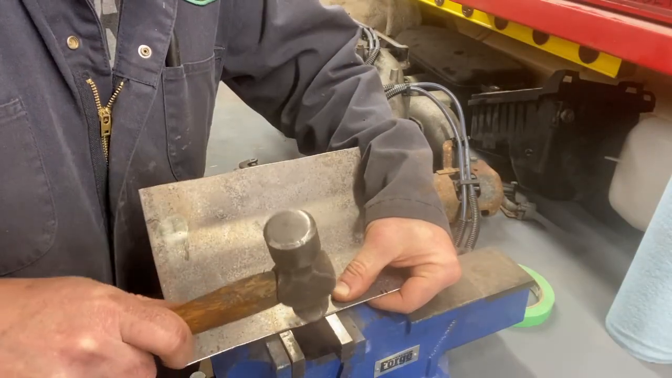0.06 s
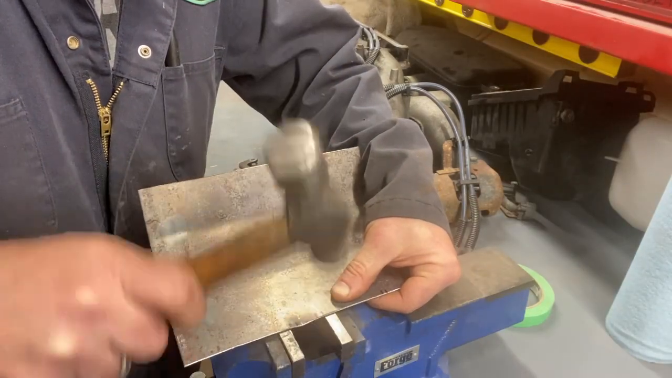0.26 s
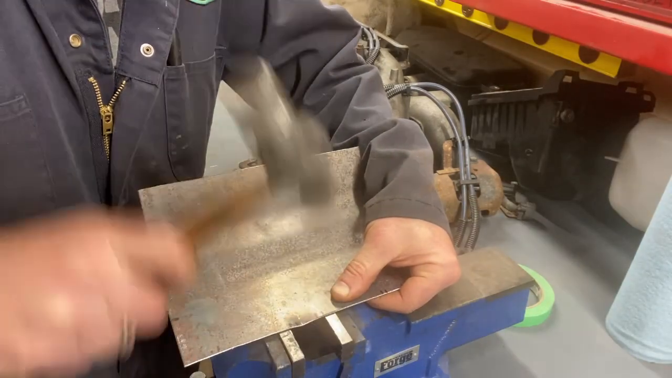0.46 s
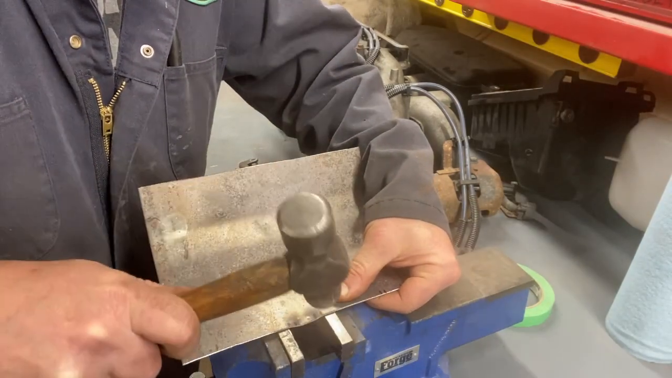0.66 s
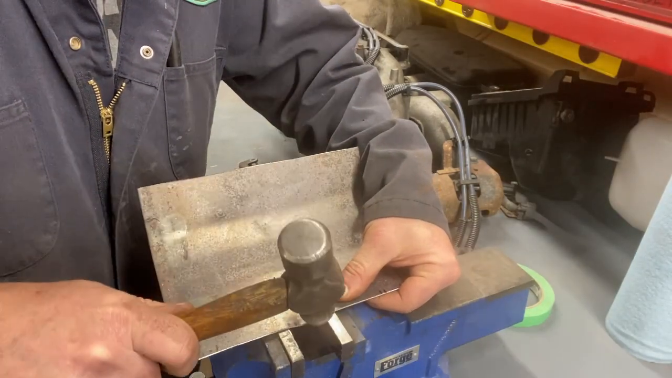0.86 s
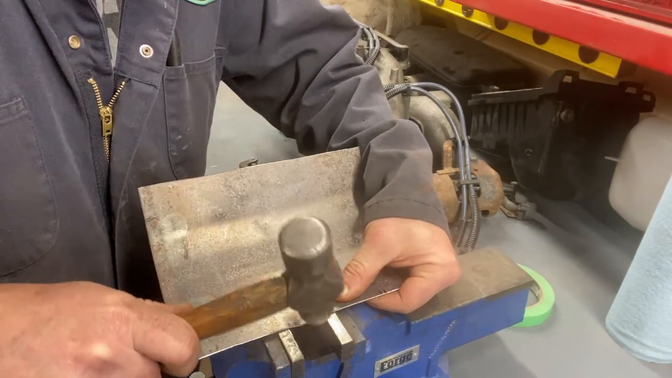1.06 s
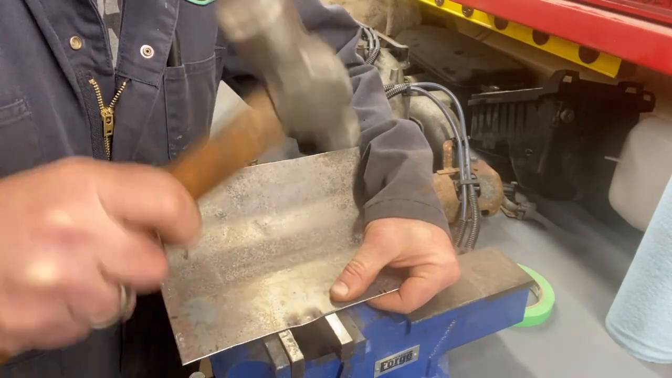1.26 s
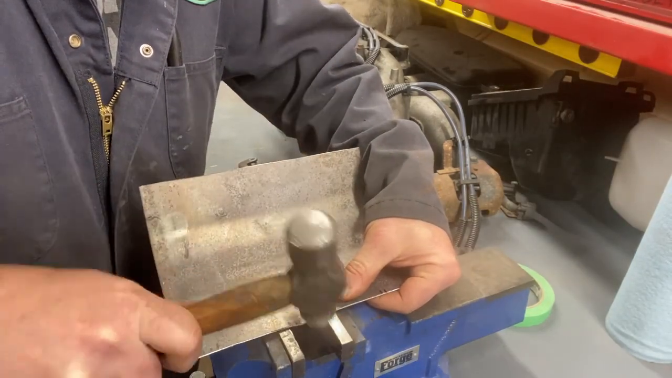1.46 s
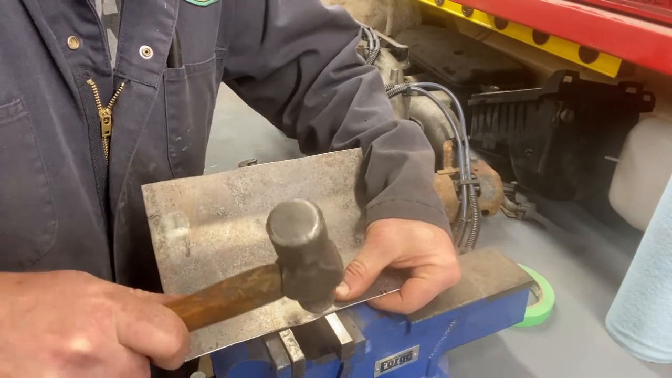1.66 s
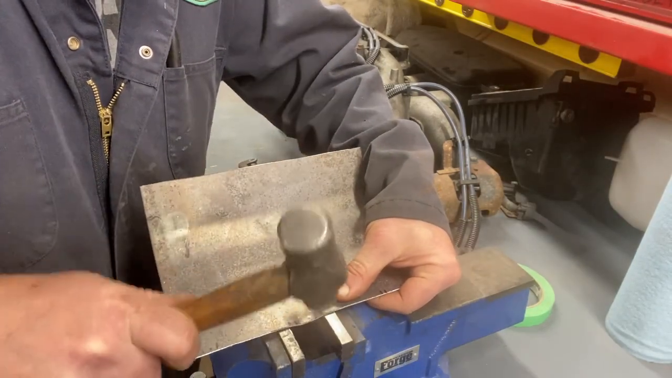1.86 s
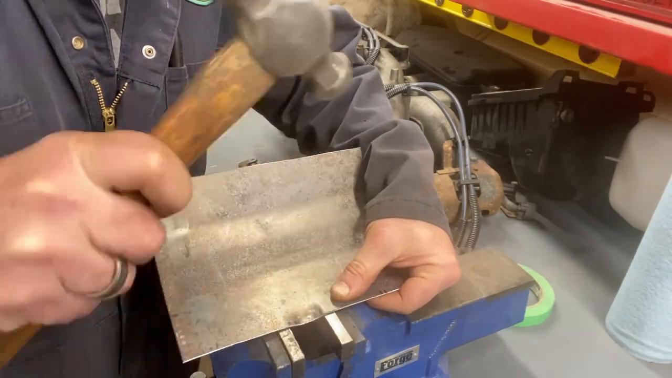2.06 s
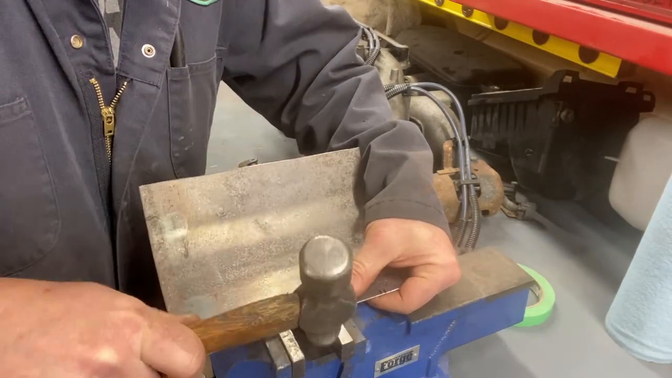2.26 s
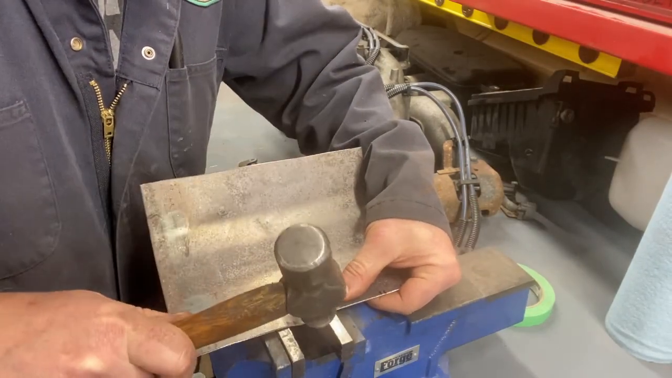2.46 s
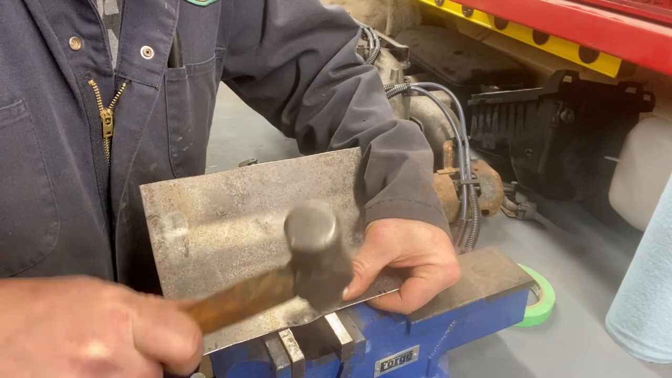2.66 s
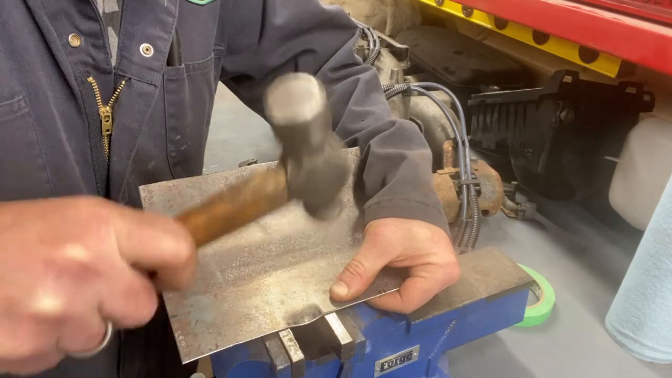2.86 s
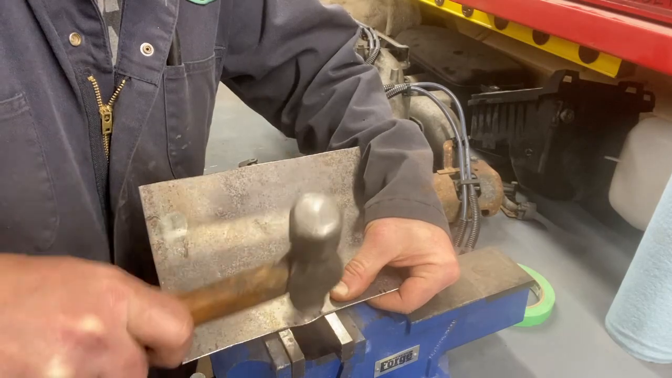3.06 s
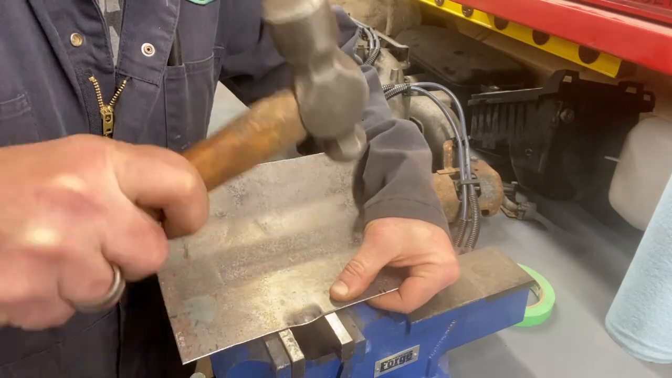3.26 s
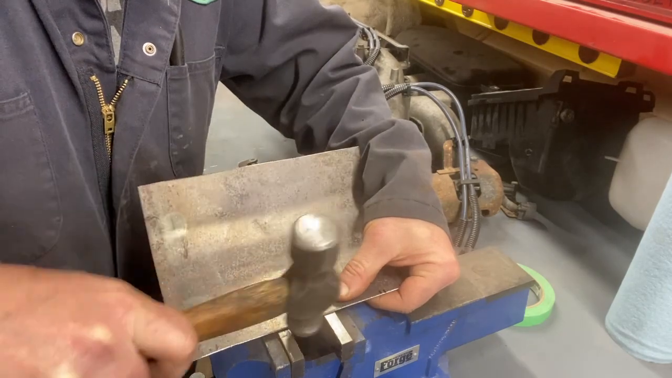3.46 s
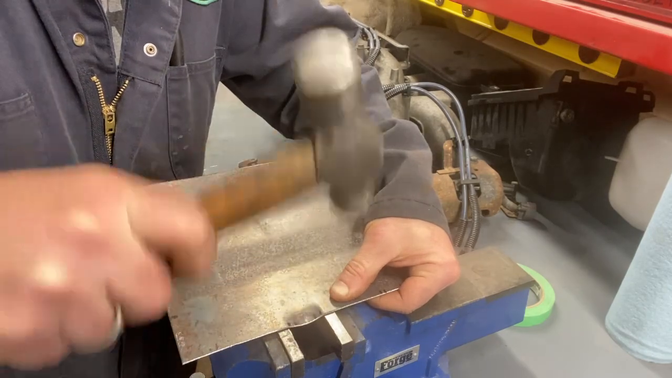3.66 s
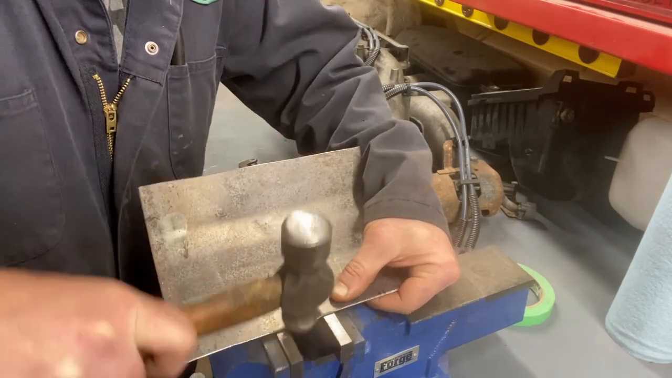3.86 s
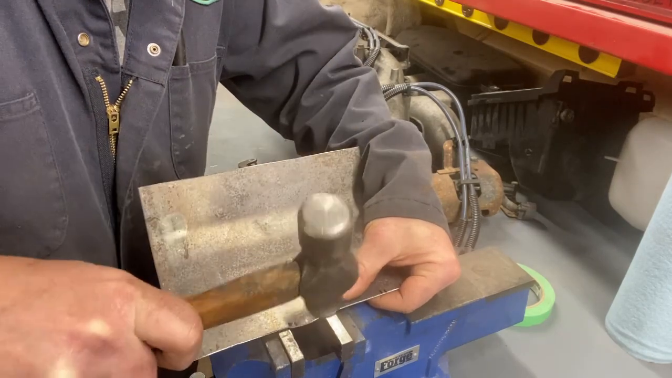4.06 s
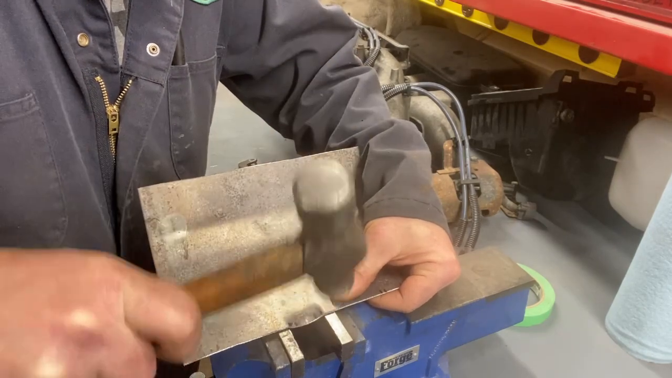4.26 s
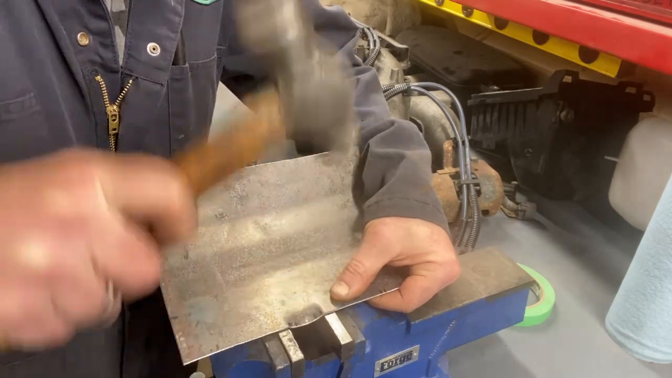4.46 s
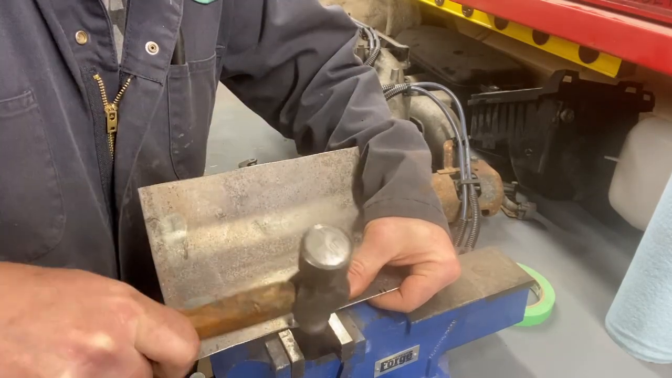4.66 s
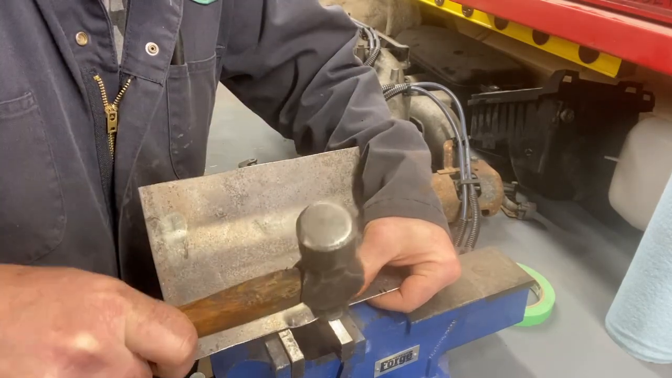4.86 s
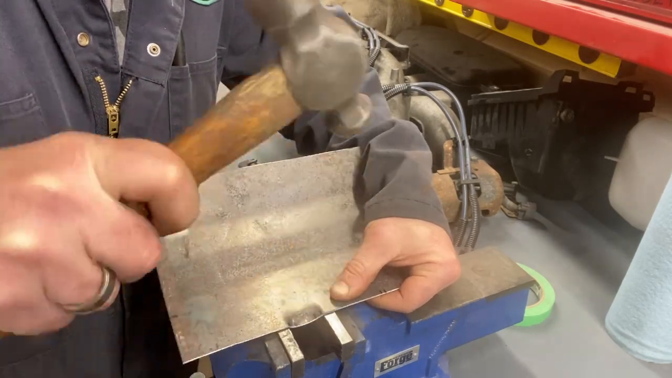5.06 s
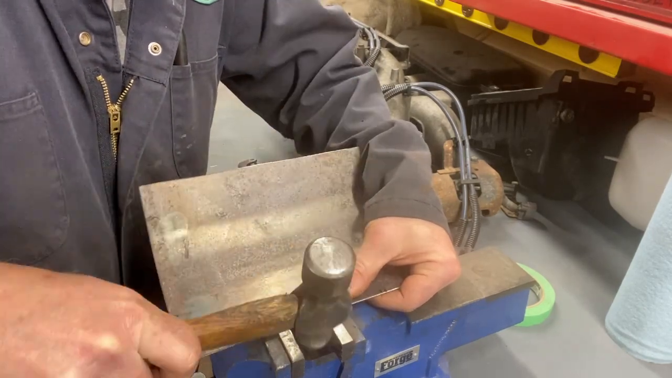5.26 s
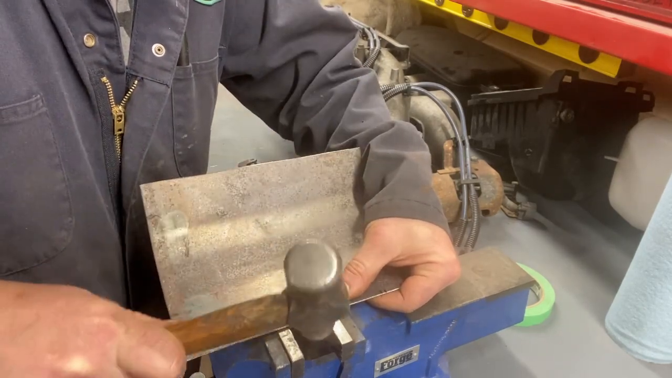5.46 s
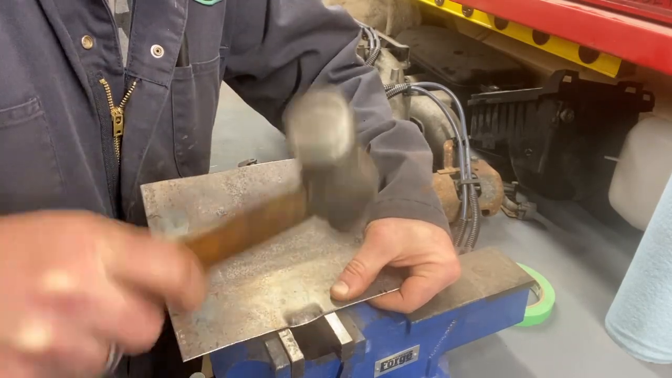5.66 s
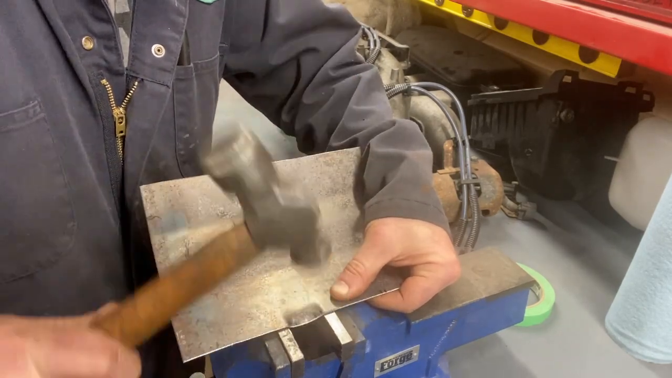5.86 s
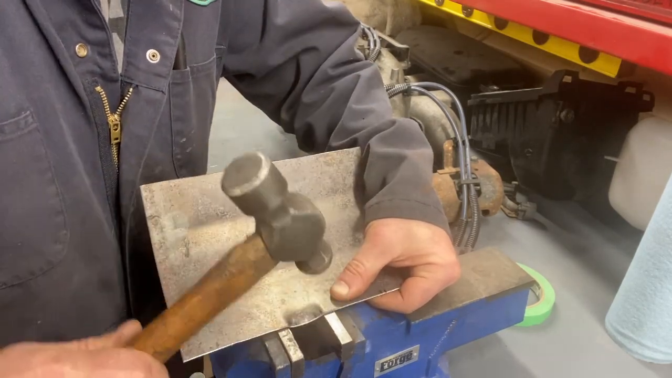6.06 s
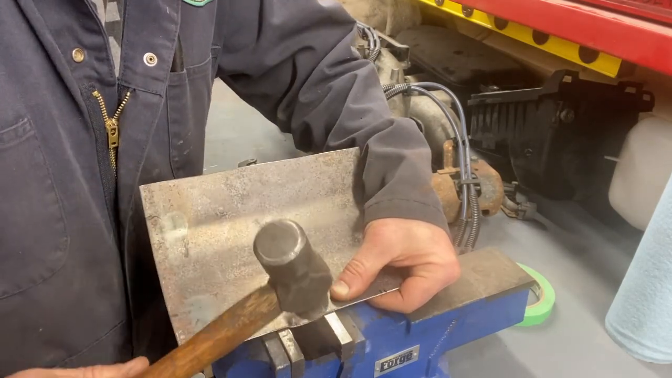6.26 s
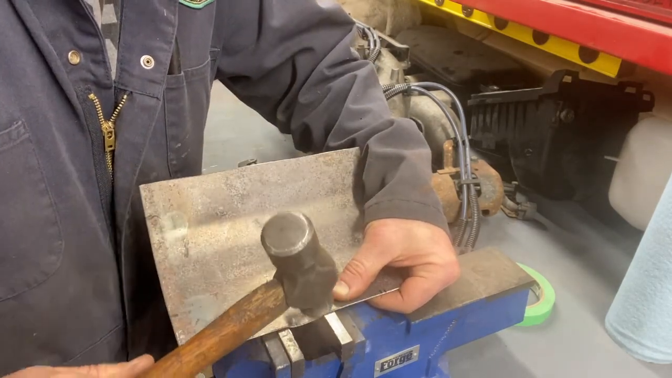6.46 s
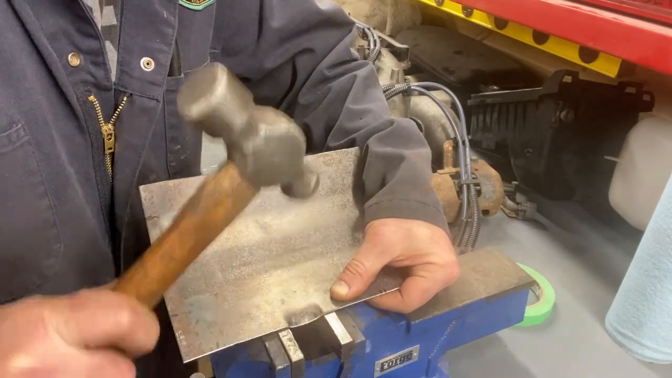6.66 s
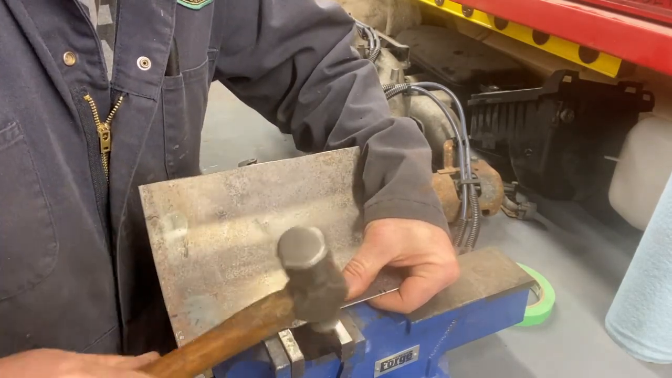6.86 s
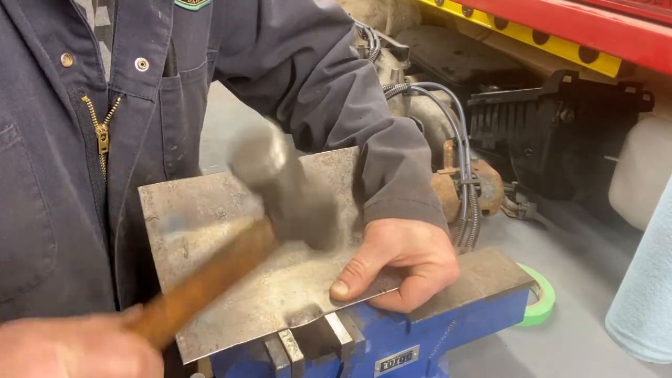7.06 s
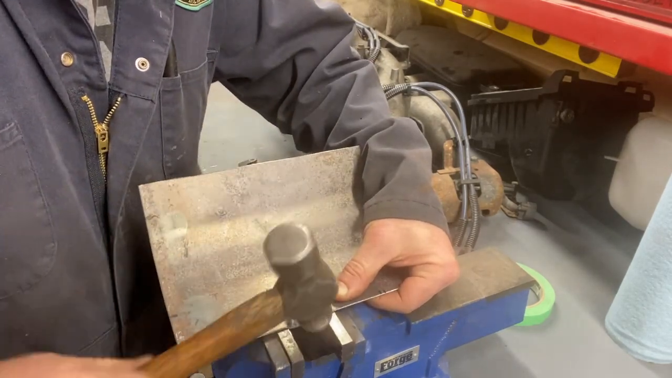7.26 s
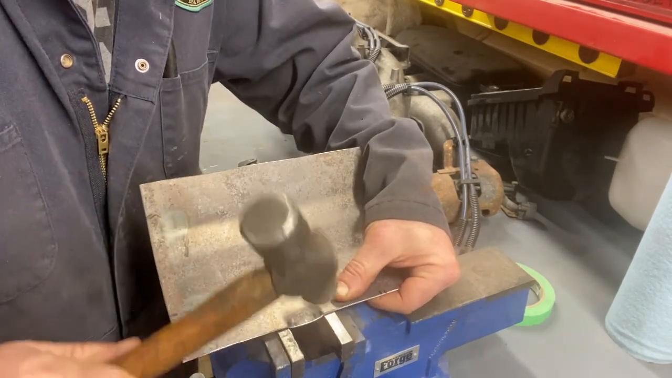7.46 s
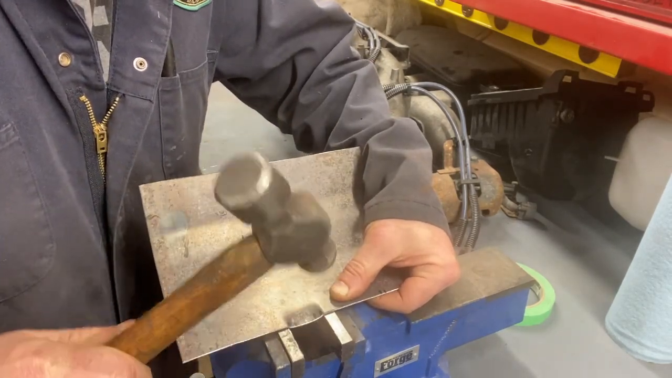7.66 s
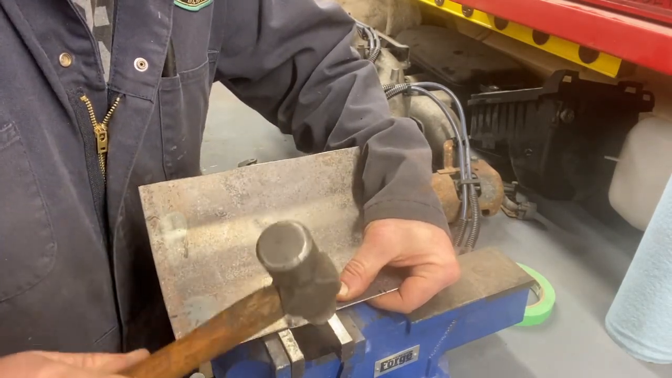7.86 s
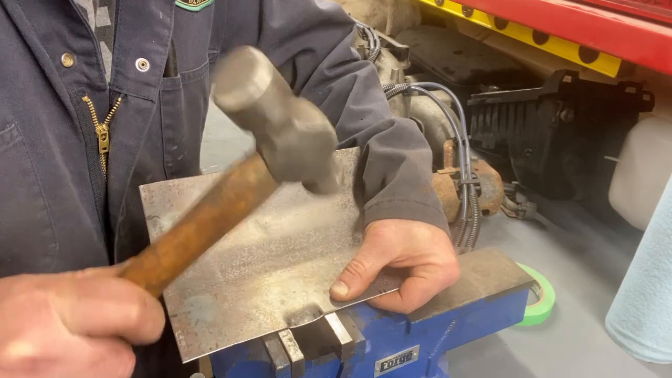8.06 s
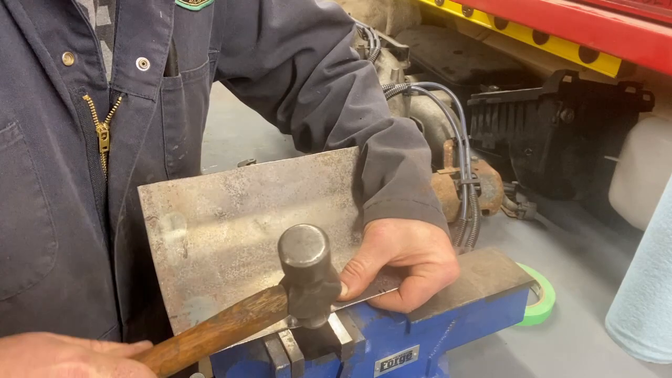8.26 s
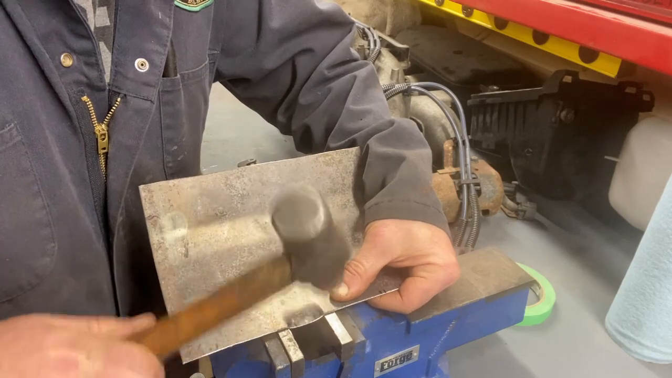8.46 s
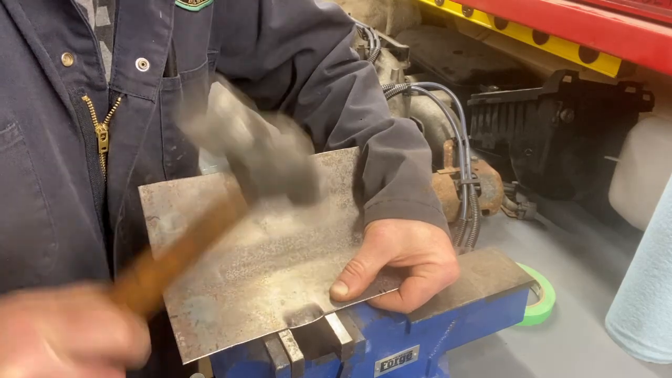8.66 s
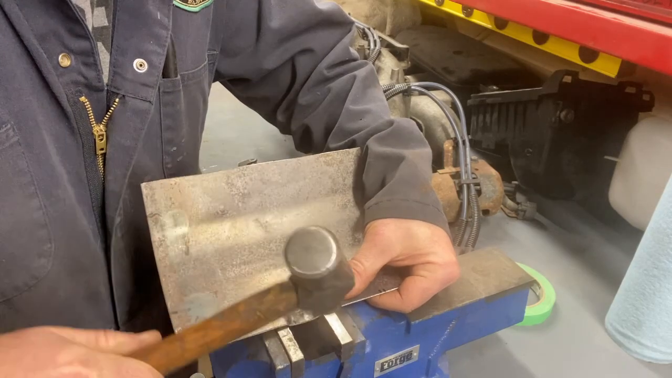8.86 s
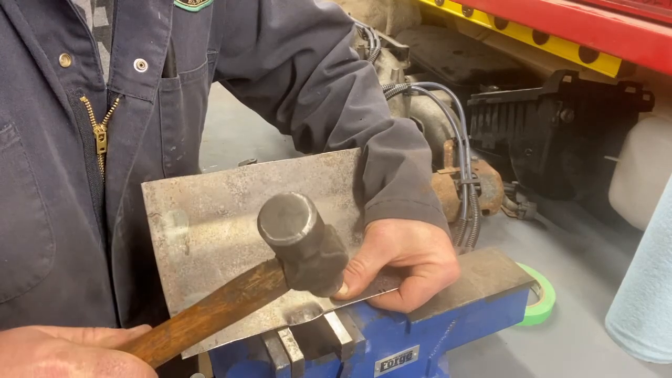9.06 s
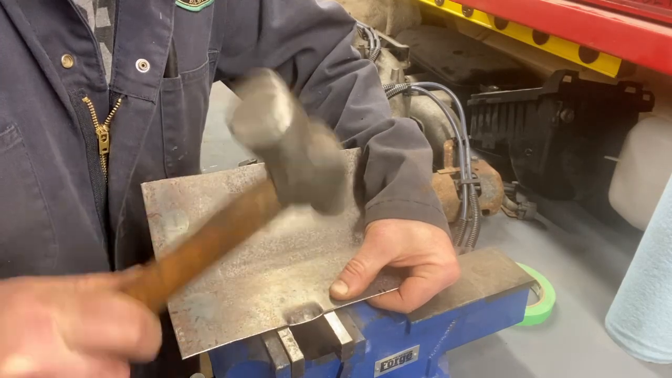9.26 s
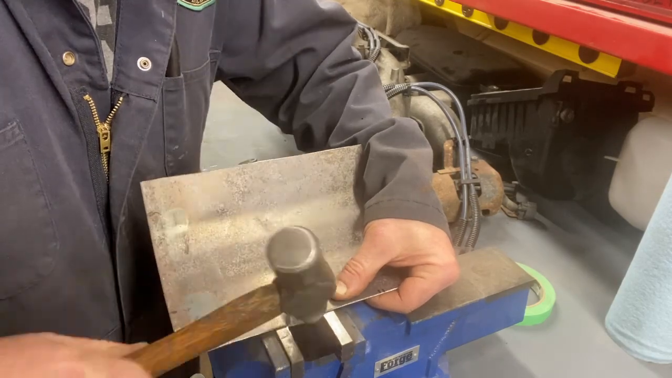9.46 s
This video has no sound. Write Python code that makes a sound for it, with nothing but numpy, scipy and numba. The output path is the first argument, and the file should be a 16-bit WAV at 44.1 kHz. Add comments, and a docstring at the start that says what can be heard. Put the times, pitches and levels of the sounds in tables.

```python
"""Hammering sheet metal in a garage

A steel hammer beats a sheet-metal edge held in a bench vise, a short step from the microphone.
Each impact cracks, clatters through sheet and jaws, excites the sheet's normal modes and thumps the
bench. Light ticks and soft rustles fall between blows; bare walls reverberate over very quiet air."""
import sys
import numpy as np
from scipy import signal
from scipy.fft import rfft, irfft, next_fast_len
from scipy.io import wavfile
from scipy.ndimage import uniform_filter1d
from numba import njit

SR = 44100
rng = np.random.default_rng(int(sys.argv[2]) if len(sys.argv) > 2 else 0)


def to_wav(sig):
    """Store sig (one row per channel, or 1-D mono) as 16-bit WAV at the path in sys.argv[1].

    Samples outside -1..1 are clipped; the rate is SR.
    """
    pcm = np.clip(np.atleast_2d(sig), -1, 1) * 32767
    pcm = np.round(pcm).astype(np.int16)
    wavfile.write(sys.argv[1], SR, pcm.T)  # frames by channels


N = 419391
LEAD_IN_S = .6  # room for a blow struck before time zero


def undb(db):
    return 10 ** (np.asarray(db) / 20)


def on_log(table, hz):
    """Interpolate (Hz, value) rows along a logarithmic frequency axis."""
    points = np.array(table, float)
    return np.interp(np.log(hz + 1), np.log(points[:, 0] + 1), points[:, 1])


def fade(t, t60):
    """Exponential damping: the level falls 60 dB in t60 seconds."""
    return np.exp(-np.log(1000) * t / t60)


def add(track, start_s, sound):
    """Superposition: sum a sound into the track."""
    i = int((start_s + LEAD_IN_S) * SR)
    part = sound[..., :track.shape[-1] - i]
    track[..., i:i + part.shape[-1]] += part


def bin_hz(size):
    return np.arange(size // 2 + 1) * SR / size


def noise(size, colour):
    """Spectral shaping: white noise filtered by (Hz, dB) rows."""
    return irfft(rfft(rng.standard_normal(size)) * undb(on_log(colour, bin_hz(size))), size)


def damped_noise(size, colour, t60s):
    """Frequency-dependent damping: each octave band of a noise decays at its own rate."""
    source = noise(size, colour)
    spectrum, hz = rfft(source), bin_hz(size)
    t, out = np.arange(size) / SR, 0
    for centre in 30 * 2. ** np.arange(10):
        share = np.clip(1 - np.abs(np.log2((hz + 1) / centre)), 0, 1)
        out = out + irfft(spectrum * share, size) * fade(t, on_log(t60s, centre))
    return out / np.std(source)


def flicker(size, step, depth_db):
    """Random amplitude modulation: a smoothed gain, drawn anew every `step` samples."""
    levels = np.repeat(rng.standard_normal(size // step + 1), step)
    return undb(depth_db * uniform_filter1d(levels, size=step // 2)[:size])


def modes(size, hz, t60, db, spread_rad, wobble=1, wobble_hz=55, wobble_db=3.5, rad_per_khz=0.65):
    """Modal synthesis: damped, wavering sinusoids, each with its own phase between the channels."""
    t, knots = np.arange(size) / SR, np.arange(size // 512 + 2) / wobble_hz
    out = np.zeros((2, size))
    for f, decay, gain in zip(hz, t60, undb(db)):
        phase, lead = 2 * np.pi * rng.random(), spread_rad * rng.standard_normal()
        level_drift, phase_drift = wobble * rng.standard_normal((2, len(knots)))
        waver = undb(wobble_db * level_drift * (knots > 0))
        waver = waver * np.exp(1j * (phase + rad_per_khz * f / 1000 * phase_drift))
        age = t[t < 1.3 * decay]
        z = gain * np.exp(2j * np.pi * f * age) * fade(age, decay) * np.interp(age, knots, waver)
        out[:, :len(z)] += np.cos(lead / 2) * z.imag + np.sin(lead / 2) * np.array([z.real, -z.real])
    return out


def tilt(table, treble_db, bass_db):
    """Impact spectrum: a shorter contact adds treble to (Hz, dB) rows, a fuller swing adds bass."""
    hz, db = np.transpose(table)
    slope = [(150, bass_db), (600, 0.0031), (2000, 0.0051), (7000, treble_db)]
    return np.transpose([hz, db + on_log(slope, hz)])


# Spectrum of the still room. Each row: frequency in Hz, relative density in dB.
AIR_SPECTRUM = [(15, -36.5), (25, -2), (86, -4.5), (358, -25), (756, -24), (1140, -25), (5120, -41.5),
                (7350, -47.5), (12000, -55.5), (15600, -70), (22000, -120)]


def room_air(size, level_db=-68):
    """Ambient noise floor: a faint hush, partly coherent between the channels."""
    common, left, right = (noise(size, AIR_SPECTRUM) for _ in range(3))
    air = common + 0.66 * np.array([left, right])
    return undb(level_db) * air / np.std(air)


# Spectrum of the wall reflections. Each row: frequency in Hz, relative density in dB.
WALL_SPECTRUM = [(40, -0.5), (150, -10.5), (600, -4.5), (2000, 6), (5000, 4), (9000, 2), (15000, -9.5)]
# Reverberation time. Each row: frequency in Hz, t60 in seconds.
WALL_T60 = [(60, 3.5), (200, 3.9), (600, 1.11), (1500, 0.72), (3500, 0.65), (7000, 0.5), (12000, 0.34)]
# Coherence of the reflections. Each row: frequency in Hz, share of power common to both channels.
WALL_COHERENCE = [(60, 0.49), (200, 0.77), (1000, 0.26), (8000, 0.37)]


def wall_reverberation(x, size=49152):
    """Diffuse field: convolution with a noise tail that builds up as echoes gather, then decays."""
    common, left, right = (rfft(damped_noise(size, WALL_SPECTRUM, WALL_T60)) for _ in range(3))
    shared = np.clip(on_log(WALL_COHERENCE, bin_hz(size)), 0, 1)
    n = np.arange(size)
    envelope = (1 - np.exp(-n / SR / 0.0013)) * (1 - n / size) ** 2
    tails = (irfft(np.sqrt(shared) * common + np.sqrt(1 - shared) * own, size) for own in (left, right))
    return np.array([signal.fftconvolve(x, envelope * tail)[:len(x)] for tail in tails])


# Rustles between blows. Each row: start in seconds, level in dB, hold in seconds.
RUSTLES = [(2.58, -50.5, .12), (5.601, -48, 0.049), (9.233, -59, 0.44)]
# Spectrum of the rubbing. Each row: frequency in Hz, relative density in dB.
RUSTLE_SPECTRUM = [(59, -44), (100, -11.5), (244, 7.5), (349, -5.5), (459, -12.5), (851, -6.5), (927, -12),
                   (6000, -52.5), (7800, -68.5), (13200, -120)]


def rustles(attack_s=.05, t60_s=1.1):
    """Friction noise, as of hand and sheet shifting: each low rustle swells, holds and fades."""
    t = np.arange(N) / SR
    rub = noise(next_fast_len(N), RUSTLE_SPECTRUM)[:N]
    envelope = 0
    for start, db, hold in RUSTLES:
        swell = np.clip((t - start) / attack_s, 0, 1)
        envelope += undb(db) * swell * fade(np.maximum(t - start - hold, 0), t60_s)
    return rub / np.std(rub) * flicker(N, 1024, depth_db=2.9) * envelope


# Hammer touching sheet. Each row: start in seconds, level in dB, centre in Hz, length in seconds.
TOUCHES = [(0.429, -66, 4430, 0.0058), (0.455, -67, 3426, 0.0057), (5.64, -61, 2500, 0.052),
           (5.752, -69, 2820, 0.055), (5.785, -64, 3460, 0.052), (7.833, -73.5, 5460, 0.033)]


def touches(track, size=8192):
    """Light contact of steel on steel: ticks and short scrapes of band-limited noise."""
    t = np.arange(size) / SR
    for start, db, hz, length in TOUCHES:
        grit = noise(size, [(hz / 4, -20), (hz, 0), (hz * 1.7, -16), (hz * 2.9, -40)])
        add(track, start, undb(db) * grit / np.std(grit) * np.exp(-(t / length) ** 2))


# Modes of the bench. Each row: frequency in Hz, t60 in seconds, relative level in dB.
BENCH_MODES = [(58, 0.15, -17), (68.7, 0.67, -17.5), (75.27, 0.89, -24.5), (108.25, 0.34, -29),
               (170.4, 0.93, -29), (229, 0.33, -16)]


def bench_thump(t, bass_db):
    """Structure-borne sound: the blow drives the bench's low modes, which rise slowly."""
    hz, t60, db = np.transpose(BENCH_MODES)
    hz = hz * (1 + 0.019 * rng.standard_normal(len(hz)))
    return modes(len(t), hz, t60, db + bass_db, spread_rad=0.12) * (1 - np.exp(-(t / 0.0046) ** 2))


# Modes of the clamped sheet. Each row: frequency in Hz, t60 in seconds, then four relative
# levels in dB, for a blow on stretch 0, 1, 2 or 3 of the edge.
SHEET_MODES = [(213.3, 0.89, -17, -17.5, -19.5, -16), (278.6, 0.28, 4, -6.5, -2, -0.5),
               (324, 0.34, -8, -12, -7.5, -8.5), (422.6, 0.22, -8.5, -13, -0.5, -2.5),
               (517.4, 0.47, -15.5, -6, -13.5, -5.5), (577, 0.71, -18, -5.5, -20.5, -19),
               (765, 0.46, -13.5, -9, -10.5, -14.5), (894, 0.26, -0.5, -4, -2.5, -3.5),
               (1038, 0.31, -7, -9, 13, -10.5), (1243, 0.28, -3, -14, -2.5, -17),
               (1420, 7.7, -49.5, -49, -49.5, -64), (1458, 0.27, -15, -4.5, 3, -1),
               (1680, 0.34, -8, -12.5, -17, -3), (2040, 0.4, -11, -18, -17.5, -23.5),
               (2280, 0.67, -18.5, -20.5, -24.5, -20), (2780, 0.26, -19, -10.5, -0.5, -7),
               (2940, 0.46, -5.5, -28, -29, -35), (3460, 0.13, -20, -17.5, -11, -11.5),
               (3730, .3, -11.5, -19, -16.5, -15.5), (4400, 0.2, -8, -21.5, -18, -24.5),
               (4730, 0.56, -13, -28, -21.5, -15), (5160, 0.26, -16.5, -24.5, -33, -27),
               (6700, 0.2, -11.5, -36, -35, -30)]
DULL_ABOVE_HZ = 4200  # a soft blow hardly excites the modes above this


def sheet_ring(t, treble_db, bass_db, stretch, head_rests, hand_cycles=1350, resting_t60_s=.22):
    """Plate vibration: the point of impact weights the modes; the hand and a resting head damp them."""
    hz, t60, *by_stretch = np.transpose(SHEET_MODES)
    db = tilt(np.transpose([hz, by_stretch[stretch]]), treble_db, bass_db)[:, 1]
    db = db + 0.71 * rng.standard_normal(len(hz)) + min(treble_db, 0) * (hz > DULL_ABOVE_HZ)
    t60 = np.where(hz > 2000, np.minimum(t60, hand_cycles / hz), t60)
    if head_rests:
        t60 = np.minimum(t60, resting_t60_s)
    hz = hz * (1 + .003 * rng.standard_normal(len(hz)))
    return modes(len(t), hz, t60, db, spread_rad=1)


# Modes of the hammer head. Each row: frequency in Hz, t60 in seconds, relative level in dB.
HEAD_MODES = [(3494, 0.041, 2), (3870, 0.15, -6), (6060, 0.049, -15)]


def knock_and_ping(edge_hz, edge_db, head_db, treble_db, rebound_s, edge_t60_s=0.036, size=4096):
    """Impact and rebound: the pinned edge knocks and the head pings twice, the second knock lower."""
    out = np.zeros((2, size + SR // 20))
    head_hz, head_t60, ping_db = np.transpose(HEAD_MODES)
    ping_db = ping_db + head_db + min(treble_db, 0) * (head_hz > DULL_ABOVE_HZ)
    attack = 1 - np.exp(-np.arange(size) / SR / 0.00016)
    for delay_s, gain_db, pitch_ratio in ((0, 0, 1), (rebound_s, -3.5, .64)):
        detune, scatter = rng.standard_normal((2, len(HEAD_MODES) + 1))
        hz = np.r_[edge_hz * pitch_ratio * (1 + .03 * detune[0]), head_hz * (1 + .006 * detune[1:])]
        db = np.r_[edge_db, ping_db] + gain_db + 1.4 * scatter
        hit = modes(size, hz, np.r_[edge_t60_s, head_t60], db, spread_rad=0.37, wobble=0)
        i = int(delay_s * SR)
        out[:, i:i + size] += hit * attack
    return out


# Spectrum of sheet and jaws rattling. Each row: frequency in Hz, relative density in dB.
CLATTER_SPECTRUM = [(24, -36), (40, -11.5), (176, -1), (249, -1.5), (479, -11.5), (600, -2.5), (680, -7.5),
                    (1070, -4), (1300, -9.5), (2700, -14.5), (6020, -24), (14100, -61.5), (16000, -87.5)]
# Damping of the clatter. Each row: frequency in Hz, base t60 in seconds.
CLATTER_T60 = [(60, 0.52), (250, 0.32), (1000, 0.41), (3000, 0.33), (8000, 0.28), (14000, 0.06)]
# Each entry: the factor on that t60 for one stretch of the edge.
CLATTER_SUSTAIN = [0.73, 0.88, 0.79, 1]


def clatter(t, treble_db, bass_db, stretch):
    """Extended source: the wide sheet rattles in bursts, differing between channels above the bass."""
    colour = tilt(CLATTER_SPECTRUM, treble_db, bass_db)
    t60s = np.array(CLATTER_T60) * [1, CLATTER_SUSTAIN[stretch]]
    mid = damped_noise(len(t), colour, t60s)
    side = 0.88 * damped_noise(len(t), tilt(colour, 0, -11.5), t60s)
    envelope = (1 - np.exp(-t / 0.0059)) * flicker(len(t), 256, depth_db=2.5)
    return np.array([mid + side, mid - side]) * envelope


# Spectrum of the contact. Each row: frequency in Hz, relative density in dB.
CRACK_SPECTRUM = [(50, -35.5), (90, -13.5), (330, -3), (650, -5.5), (1000, -9.5), (1600, 1.5), (2500, -1.5),
                  (3000, -7), (3480, -7.5), (4100, -11.5), (5900, -10.5), (8500, -23), (11700, -36.5),
                  (16000, -53.5)]


def crack(t, treble_db, bass_db, chatter_s, gain_db=5.5):
    """Contact noise: a broadband burst that lasts while the head chatters on the steel."""
    burst = noise(len(t), tilt(CRACK_SPECTRUM, treble_db, bass_db))
    return undb(gain_db) * burst / np.std(burst) * fade(t, 0.13) / (1 + (t / chatter_s) ** 8)


# Hammer blows; only the tail of the first is heard. Each row: start in seconds, level in dB,
# treble, bass, clatter and ring offsets in dB, chatter time in seconds, knock pitch in Hz,
# knock and head ping offsets in dB, rebound delay in seconds.
BLOWS = [(-0.36, -6.5, -6.5, 2.5, -1, -10.5, 0.0038, 1500, 2.5, -3, .005),
         (0.157, -22, 10, 1, -3.5, -9.5, 0.0078, 950, 5.5, -5.5, .005),
         (0.541, -5, 1.5, -1, 4, -7, 0.018, 1700, 3, -8, .004),
         (1.452, -5.5, 4.5, -1.5, 6, -9, 0.011, 1300, 3, -7, .003),
         (2.207, -5, 3, -1, 0.5, -9.5, 0.027, 1500, 3.5, -4.5, .005),
         (3.05, -31, -13, -0.5, 3, 5.5, 0.0042, 1000, 12, -14, .006),
         (3.436, -8.5, 5.5, -4.5, 5.5, -3.5, 0.0077, 1350, 2, -2, .006),
         (3.9, -5.5, 3.5, -5.5, 4, -7.5, 0.015, 1490, 2.5, -7, .005),
         (4.573, -6, 6.5, -3.5, 3, -10, 0.011, 1550, -1, -14, .0075),
         (5.2095, -5.5, 5.5, -4.5, 0, -6.5, 0.012, 1260, 4, -4.5, .0075),
         (6.376, -42.5, -6.5, 5.5, -3, -8, .006, 1500, 4.5, 1, 0.0015),
         (6.788, -5.5, 5, -5.5, -3.5, -10.5, 0.011, 1600, 2.5, 1.5, .003),
         (7.3021, -10, 2.6, -1, 1, -5.5, 0.0084, 1560, 5.5, 0.5, .0075),
         (8.2328, -11, 4.5, -5, 5.5, -4, 0.013, 1100, 6.5, 1.5, .007),
         (8.758, -6, 1, -1, -0.5, -13, 0.012, 1550, 5.5, 0.5, .0045),
         (9.496, -10.5, 4.5, 1.5, -0.5, -10, 0.0096, 1550, 4.5, 3, .005)]
# The hammer works along the edge. Each entry: the stretch, 0 to 3, on which one blow lands.
STRETCHES = (1, 0, 1, 1, 1, 1, 2, 2, 2, 2, 0, 3, 3, 3, 1, 3)


def hammer_blows(pan_db=1, rests_below_db=-25.5):
    """Impulsive excitation: each blow yields noise and ringing modes, returned as two stereo tracks."""
    noisy, pitched = np.zeros((2, 2, N + int(LEAD_IN_S * SR)))
    t_noise, t_ring = np.arange(16384) / SR, np.arange(36864) / SR
    noise_window = (1 - np.exp(-t_noise / 0.0065)) * (1 - (t_noise / t_noise[-1]) ** 2) ** 2
    ring_window = (1 - np.exp(-t_ring / 0.0007)) * (1 - (t_ring / t_ring[-1]) ** 2)
    for blow, stretch in zip(BLOWS, STRETCHES):
        start, db, treble_db, bass_db, clatter_db, ring_db = blow[:6]
        chatter_s, edge_hz, edge_db, head_db, rebound_s = blow[6:]
        gain = undb(db + np.array([[pan_db], [-pan_db]]) / 2)
        contact = crack(t_noise, treble_db, bass_db, chatter_s)
        rattle = undb(clatter_db) * clatter(t_noise, treble_db, bass_db, stretch)
        add(noisy, start, gain * (contact + rattle) * noise_window)
        add(pitched, start, gain * knock_and_ping(edge_hz, edge_db, head_db, treble_db, rebound_s))
        sheet = sheet_ring(t_ring, treble_db, bass_db, stretch, head_rests=db < rests_below_db)
        add(pitched, start, gain * (undb(ring_db) * sheet + bench_thump(t_ring, bass_db)) * ring_window)
    return noisy, pitched


# Phase between the microphone ports. Each row: frequency in Hz, lead of the left in radians.
PORT_PHASE = [(60, -0.5), (330, 1.53), (600, -3), (1000, 1.67), (3500, 0.97), (4100, 5.5), (5300, -13.5),
              (6300, 5.5), (6800, -1.5), (8200, 0), (10400, 3), (14000, 8)]
# Balance of the ports. Each row: frequency in Hz, left minus right in dB.
PORT_BALANCE = [(60, 0.2), (110, 0.5), (200, 2.5), (380, 15.5), (700, -5), (1290, 4.5), (2380, 3.5),
                (4400, 2.5), (8120, -3), (15000, -1.5)]


def microphone_port(x, sign):
    """Transfer function: direct sound reaches each port (+1 left, -1 right) at its own gain and phase."""
    size = next_fast_len(len(x))
    hz = bin_hz(size)
    phase = sign * uniform_filter1d(on_log(PORT_PHASE, hz), size=size // 200) / 2
    gain = undb(sign * on_log(PORT_BALANCE, hz) / 2)
    return irfft(rfft(x, size) * gain * np.exp(1j * phase), size)[:len(x)]


def scene():
    """Superposition of the direct sound, the reverberant field and the room's air."""
    noisy, pitched = hammer_blows()
    touches(noisy)
    add(noisy, 0, rustles())
    # knocks, pings and ringing stay mostly dry; cracks and clatter carry the reverberation
    reverb_send = (noisy + undb(-10) * pitched).mean(0)
    reverberant = undb(-49) * wall_reverberation(reverb_send) * undb([[1.5], [-1.5]])
    direct = np.array([microphone_port(x, sign) for x, sign in zip(noisy + pitched, (1, -1))])
    return (direct + reverberant)[:, -N:] + room_air(next_fast_len(N))[:, :N]


@njit
def follow(x, attack_s, release_s):
    """Envelope detection: one-pole smoothing with separate rise and fall times."""
    envelope, level = np.empty(len(x)), 0.
    for i in range(len(x)):
        level += (x[i] - level) / (SR * (attack_s if x[i] > level else release_s))
        envelope[i] = level
    return envelope


def record(dry, knee_db=-36, ratio=1.623, attack_s=0.008, release_s=0.033, split_hz=730, quiet_db=-63):
    """Compression ducks each blow, expansion lowers faint treble; soft clipping and a low-pass follow."""
    level = follow(np.abs(dry).mean(0), attack_s, release_s)
    compressed = dry * np.minimum(undb(knee_db) / (level + 1e-9), 1) ** (1 - 1 / ratio) * undb(3.5)
    treble = compressed - signal.sosfilt(signal.butter(1, split_hz, fs=SR, output="sos"), compressed)
    treble_level = follow(np.abs(treble).mean(0), 0.001, release_s)
    treble_gain = np.clip(treble_level / undb(quiet_db), 0.33, 1)
    expanded = compressed - treble * (1 - treble_gain)
    low_pass = signal.ellip(10, .2, 90, 16000, fs=SR, output="sos")
    return signal.sosfilt(low_pass, np.tanh(0.61 * expanded) / 0.77)


dry = scene()
out = record(dry)
to_wav(out)
```